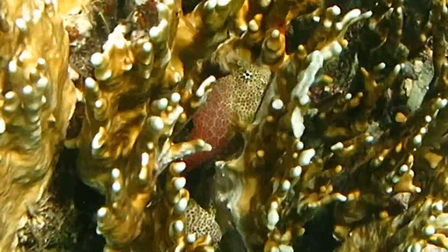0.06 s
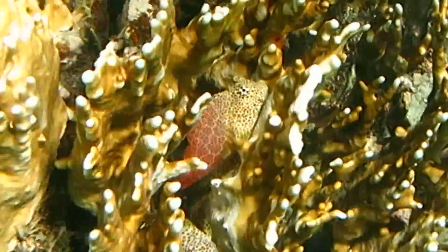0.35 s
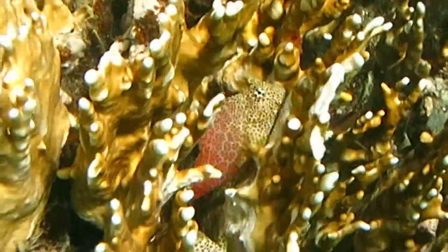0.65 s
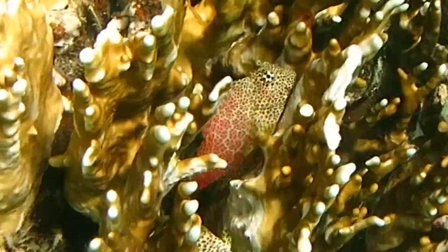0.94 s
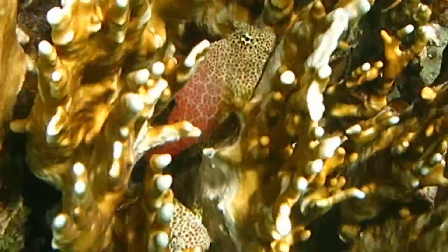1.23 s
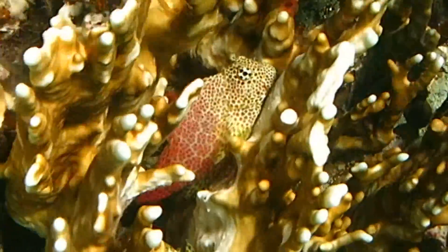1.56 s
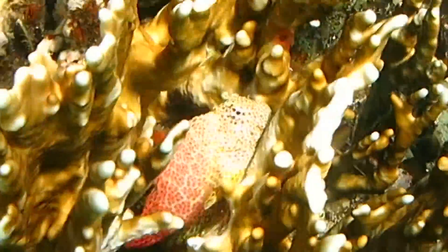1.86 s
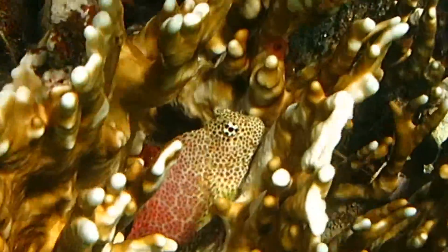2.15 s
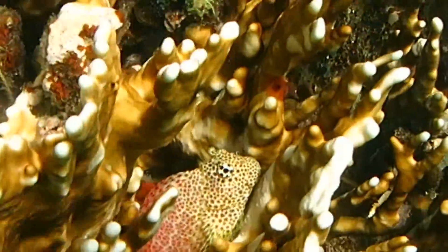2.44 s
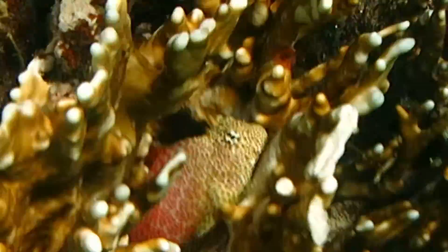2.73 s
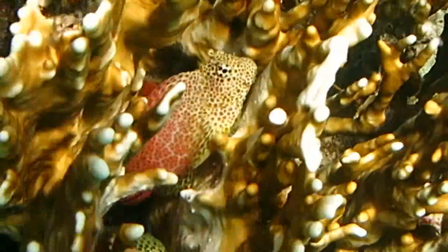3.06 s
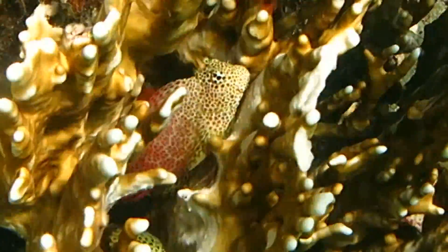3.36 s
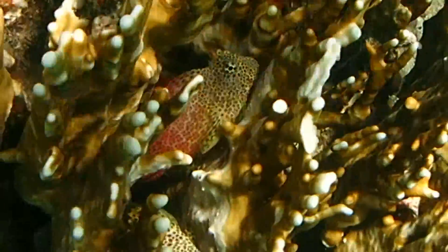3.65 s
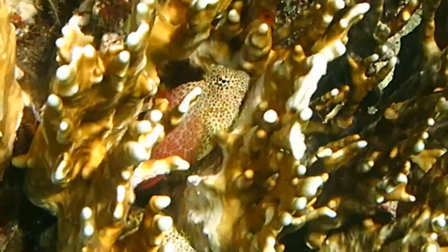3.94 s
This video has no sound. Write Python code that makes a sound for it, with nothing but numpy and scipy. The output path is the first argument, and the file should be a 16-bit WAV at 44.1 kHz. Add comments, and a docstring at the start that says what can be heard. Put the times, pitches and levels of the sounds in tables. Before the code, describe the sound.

A camera's zoom motor ratchets in rapid, ringing clicks from about 2 to 2.9 seconds and again from 3.4 to 4, heard inside an underwater housing. A low water wash, faint hiss and hum run throughout, with small rising bubble bloops and dull glugs. The water rumbles slightly more around 1 second. Shrimp snap here and there, sharpest near 0.2 and 3.7 seconds.

```python
"""A low wash of water and a camera's hiss, heard from inside its housing at a coral reef.
The housing hums at its modes, surging water rumbles and a faint motor whirrs. Shrimp snap,
air pockets bloop upward in pitch and water glugs against the housing. From about 2 s a small
drive, probably the zoom, ratchets in two runs of double knocks that ring the housing."""
import sys
import numpy as np
from scipy import signal
from scipy.fft import rfft, irfft
from scipy.io import wavfile
from scipy.ndimage import uniform_filter1d

SR = 44100
rng = np.random.default_rng(int(sys.argv[2]) if len(sys.argv) > 2 else 0)


def master_out(mix):
    """Clip the mix to full scale and print it as 16-bit PCM to the path in sys.argv[1]."""
    frames = np.transpose(np.atleast_2d(mix))
    ceiling = np.clip(frames, -1, 1)
    pcm = np.round(ceiling * 32767).astype(np.int16)
    wavfile.write(sys.argv[1], SR, pcm)


N = 176400


def amp(db):
    """Decibels to gain."""
    return 10 ** (np.asarray(db) / 20)


def unit_rms(x):
    """Scale to rms 1."""
    return x / np.sqrt(np.mean(x ** 2))


def seconds(samples):
    """Time axis."""
    return np.arange(samples) / SR


def add(out, start_s, sound):
    """Mix a sound in at a time."""
    i = int(np.clip(start_s * SR, 0, N - 1))
    out[..., i:i + sound.shape[-1]] += sound[..., :N - i]


def wander(rate_hz):
    """Random drift of rms 1."""
    hold = int(SR / rate_hz)
    steps = np.repeat(rng.standard_normal(N // hold + 1), hold)
    return unit_rms(uniform_filter1d(steps, hold)[:N])


def noise(spectrum, channels=2, envelope=1.):
    """Enveloped white noise, coloured by a causal filter of power gain 1."""
    hz, db = np.array(spectrum).T
    bins_hz = np.maximum(np.arange(N // 2 + 1) * SR / N, 1)
    gain = unit_rms(amp(np.interp(np.log(bins_hz), np.log(hz), db)))
    cepstrum = irfft(np.log(gain), N)
    cepstrum[1:N // 2] *= 2  # fold to minimum phase
    cepstrum[N // 2 + 1:] = 0
    response = irfft(np.exp(rfft(cepstrum)), N)[None, :N // 10]
    white = rng.standard_normal((channels, N))
    return signal.fftconvolve(envelope * white, response, axes=1)[:, :N]


# Wash colour. Each row: frequency in Hz, relative density in dB.
WASH_SPECTRUM = [(90, -20.5), (230, 3), (400, -1.5), (560, -1.5), (880, -6.5), (2000, -30.5)]


def water_wash(level_db=-55.5, wander_db=2):
    """Low wash of water, wavering in level."""
    return noise(WASH_SPECTRUM, channels=1) * amp(level_db + wander_db * wander(rate_hz=16))


# Hiss colour. Each row: frequency in Hz, relative density in dB.
HISS_SPECTRUM = [(100, -38.5), (500, 14.5), (1100, 15), (2000, 9.5), (2800, 3), (7000, -0.5), (9400, -3.5),
                 (10500, -5.5), (12000, -3.5), (13700, -1.5), (15500, -30)]


def camera_hiss(hiss_db=-52, whine_hz=15735, whine_left_db=-71, whine_right_db=-77):
    """The camera's own steady hiss and thin whine."""
    whine = np.sqrt(2) * np.sin(2 * np.pi * whine_hz * seconds(N))
    return amp(hiss_db) * noise(HISS_SPECTRUM) + np.outer(amp([whine_left_db, whine_right_db]), whine)


# Housing modes. Each row: frequency in Hz, T60 in seconds, left and right relative levels in dB,
# left and right polarities.
HOUSING_MODES = [(918, 0.035, -6, -31.5, 1, 1), (974, 0.0088, 3.5, -0.5, -1, 1),
                 (1216, 0.035, -2.5, -8.5, 1, -1), (1509, 0.022, -0.5, -7, 1, 1),
                 (1664.4, 0.041, -13, -8, 1, 1), (1760, 0.0043, -71, -2.5, -1, -1),
                 (2040, 0.035, -17, -13.5, -1, 1), (2215, 0.015, -9, -28, -1, 1),
                 (3035, 0.034, -34.5, -17, 1, 1)]


def housing_ring(detune_share=0.008, scatter_db=0.8, highpass_hz=684):
    """One blow rings the housing's damped modes, never quite the same twice."""
    t = seconds(4096)
    ring = np.zeros((2, len(t)))
    for hz, t60_s, left_db, right_db, left_sign, right_sign in HOUSING_MODES:
        detuned_hz = hz * (1 + detune_share * rng.standard_normal())
        mode = np.sin(2 * np.pi * detuned_hz * t) * np.exp(-np.log(1000) * t / t60_s)
        gains = np.sign([left_sign, right_sign]) * amp([left_db, right_db])
        ring += np.outer(gains, mode) * amp(scatter_db * rng.standard_normal())
    return signal.sosfilt(signal.butter(2, highpass_hz, "high", fs=SR, output="sos"), ring)


def housing_hum(level_db=-52, lowpass_hz=1950):
    """Noise keeps the housing murmuring at its modes."""
    hum = np.zeros((2, N))
    for _ in range(10):
        hum += signal.fftconvolve(rng.standard_normal((1, N)), housing_ring(), axes=1)[:, :N]
    hum = signal.sosfilt(signal.butter(2, lowpass_hz, fs=SR, output="sos"), hum)
    return amp(level_db) * unit_rms(hum)


# Rumble colour. Each row: frequency in Hz, relative density in dB.
RUMBLE_SPECTRUM = [(25, -45), (68, 1), (130, -3.5), (220, 6.5), (420, -28)]
# Course of the surge. Each row: time in seconds, level in dB.
SURGE_LEVELS = [(.1, -64.5), (.8, -62), (.92, -56), (1.02, -56.5), (1.3, -56), (1.55, -62.5), (2.2, -60.5),
                (3.6, -72.5)]


def water_rumble(wander_db=2):
    """Water surges past the housing."""
    surge_db = np.interp(seconds(N), *np.array(SURGE_LEVELS).T)
    return noise(RUMBLE_SPECTRUM, channels=1) * amp(surge_db + wander_db * wander(rate_hz=25.66))


def motor(pitch_hz=1619, wander_hz=5.5, level_db=-62):
    """A faint, slightly unsteady whirr inside the camera."""
    hz = pitch_hz + wander_hz * wander(rate_hz=60)
    return amp(level_db) * np.sqrt(2) * np.sin(2 * np.pi * np.cumsum(hz) / SR)


# Near shrimp snaps. Each row: start in seconds, left sizzle, left crack and housing ring gains in dB.
NEAR_SNAPS = [(0.207, -27.5, -33.5, -27), (.4328, -37, -43, -66), (0.8829, -31, -66, -48),
              (0.9807, -38.5, -43.5, -39), (1.086, -31.5, -68, -58), (2.7107, -40, -49, -57),
              (0.467, -62, -47, -49), (1.692, -52, -45, -38), (3.331, -38, -52, -52),
              (3.4596, -43, -36, -53), (3.5849, -24, -34, -55), (3.6693, -15, -25, -47),
              (3.8304, -38.5, -34.5, -44), (3.9883, -26.5, -32.5, -48)]
# Colours of a snap's high sizzle and lower crack. Each row: frequency in Hz, relative density in dB.
SIZZLE_SPECTRUM = [(7000, -40), (10500, -24), (11800, -4), (14000, 0), (15000, -6), (16500, -22)]
CRACK_SPECTRUM = [(600, -15), (2000, 3.5), (3600, 12), (5400, 14.5), (7700, 16), (9500, 8), (12000, -50),
                  (16000, -26)]


def shrimp(decay_s=0.0014, tail_s=0.004, tail_db=-15):
    """Near snaps sizzle, crack and ring the housing; far ones make a faint crackle."""
    right_lag_s, right_sizzle_db = 0.0001, -9
    far_per_s, far_db, far_spread_db = 43, -58.5, 6.5
    sizzle, crack, rings = np.zeros((3, 2, N))
    t = seconds(1024)
    envelope = np.exp(-t / decay_s) + amp(tail_db) * np.exp(-t / tail_s)
    for start_s, sizzle_db, crack_db, ring_db in NEAR_SNAPS:
        for side, (lag_s, side_db) in enumerate(((0, 0), (right_lag_s, right_sizzle_db))):
            add(sizzle[side], start_s + lag_s, amp(sizzle_db + side_db) * envelope)
            add(crack[side], start_s + lag_s, amp(crack_db + side_db / 2) * envelope)
        add(rings, start_s, amp(ring_db) * housing_ring())
    for _ in range(int(far_per_s * N / SR)):
        start_s = rng.uniform(0, N / SR)
        for layer in (sizzle, crack):
            stereo_db = far_db + far_spread_db * np.clip(rng.standard_normal(2), -2, 2)
            add(layer, start_s, np.outer(amp(stereo_db), envelope))
    return noise(SIZZLE_SPECTRUM, envelope=sizzle) + noise(CRACK_SPECTRUM, envelope=crack) + rings


# Air pockets. Each row: start in seconds, starting pitch in Hz, gain in dB, decay in seconds,
# pitch rise as a share.
AIR_POCKETS = [(.208, 940, -22, 0.003, .02), (.412, 231, -36, 0.028, 0.071),
               (.458, 218, -31.5, 0.016, 0.12), (.761, 212, -33, 0.015, 0.13),
               (0.846, 439, -35, 0.015, 0.11), (1.07, 242, -35.5, 0.018, 0.3),
               (1.162, 261, -38.5, .018, 0.48), (1.408, 200, -31, 0.015, 0.72),
               (1.516, 207, -27.5, 0.012, 1), (1.607, 219, -32, 0.015, 0.48),
               (1.784, 233, -32, 0.011, 0.74), (1.895, 409, -35, .018, 0.065),
               (1.928, 697, -36, 0.0081, 0.055), (1.959, 1250, -34, 0.0059, 0.041),
               (2.007, 209.5, -27, 0.017, 0.85), (2.128, 205.4, -30.5, 0.025, 0.18),
               (2.127, 483, -26.5, 0.0062, 0.042), (2.318, 209, -29.5, 0.027, 0.58),
               (2.473, 211, -29.5, 0.024, 0.29), (2.611, 236, -28.5, .018, 0.56),
               (2.715, 221, -36.5, 0.023, 0.56), (2.787, 235.7, -27.5, 0.026, 0.3),
               (2.937, 202, -26.5, 0.019, 0.5), (3.14, 251, -35, 0.021, 0.44),
               (3.248, 247, -32, 0.017, 0.31), (3.445, 231, -24.5, 0.0071, 0.62)]


def bubbles(attack_s=0.0028, glide_s=0.0342, wobble_share=0.045, tail_db=-35, highpass_hz=114):
    """Each air pocket rings and glides up as it dies away."""
    out, t = np.zeros(N), seconds(8192)
    attack = 1 - np.exp(-t / attack_s)
    for start_s, start_hz, db, decay_s, rise_share in AIR_POCKETS:
        glide = 1 + rise_share * (1 - np.exp(-t / glide_s))
        wobble = 1 + wobble_share * wander(rate_hz=133)[:len(t)]
        tone = np.sin(2 * np.pi * np.cumsum(start_hz * glide * wobble) / SR)
        fade = np.exp(-t / decay_s) + amp(tail_db) * np.exp(-t / (2 * decay_s))
        add(out, start_s, amp(db) * attack * fade * tone)
    return signal.sosfilt(signal.butter(2, highpass_hz, "high", fs=SR, output="sos"), out)


# Slaps of water. Each row: start in seconds, relative level in dB, decay in seconds.
WATER_SLAPS = [(0.765, -48, 0.011), (0.891, -35.5, 0.0075), (0.9008, -34, 0.0043), (1.094, -48.5, 0.024),
               (1.277, -43, 0.0088), (1.353, -44, 0.011), (2.688, -48.5, 0.0088), (2.767, -42.5, 0.0084),
               (1.677, -42.5, 0.0074), (1.889, -45, 0.023), (2.128, -42, 0.0067), (2.215, -47, 0.012),
               (3.258, -40.5, 0.0086), (3.849, -44, 0.011)]
# Glug colour. Each row: frequency in Hz, relative density in dB.
GLUG_SPECTRUM = [(35, -18), (70, -3.5), (240, 10.5), (380, -1), (560, 7), (710, 4.5), (950, -15),
                 (1300, -3.5), (6000, -73)]


def glugs(attack_s=0.00055, gain_db=6.5):
    """Short dull slaps of water on the housing, the same in both ears."""
    envelope, t = np.zeros(N), seconds(8192)
    attack = 1 - np.exp(-t / attack_s)
    for start_s, db, decay_s in WATER_SLAPS:
        add(envelope, start_s, amp(db + gain_db) * attack * np.exp(-t / decay_s))
    return noise(GLUG_SPECTRUM, channels=1, envelope=envelope)


# Ratchet strokes. Each row: start in seconds, relative level in dB, gap to second knock in seconds.
RATCHET_STROKES = [(2.027, 0, 0.0076), (2.071, -1.5, 0.0097), (2.1111, -2.5, 0.015), (2.1536, -6.5, 0.0085),
                   (2.1945, -3.5, 0.016), (2.236, -3.5, .0149), (2.2785, -3, 0.015), (2.3206, -3, 0.01),
                   (2.3619, -0.5, 0.0095), (2.4027, -0.5, 0.011), (2.4453, -2, 0.0093),
                   (2.4871, -2.5, 0.0093), (2.5294, -2.5, 0.0096), (2.5719, -1.5, 0.012),
                   (2.6129, -3, 0.013), (2.6526, -4.5, 0.014), (2.695, -3, 0.016), (2.736, -5.5, 0.022),
                   (2.777, -2.5, 0.013), (2.8211, -0.5, 0.013), (2.861, -3.5, 0.027),
                   (3.4022, -3.5, 0.0068), (3.4472, -3, 0.0085), (3.487, -0.5, 0.013), (3.536, -1, 0.0091),
                   (3.5722, -2, 0.012), (3.6128, -2, 0.013), (3.656, -2, 0.013), (3.6977, -1.5, 0.011),
                   (3.738, -1, 0.011), (3.7797, -3, 0.0098), (3.822, -4, 0.01), (3.8625, -3, 0.013),
                   (3.907, -3, 0.012), (3.9466, -2, 0.01), (3.9889, -2, 0.01)]
# Colour of a knock's contact noise. Each row: frequency in Hz, relative density in dB.
CONTACT_SPECTRUM = [(500, -19), (1550, 6.5), (2500, 2), (3100, 0.5), (4400, -8.5), (5800, -10.5),
                    (6800, -5.5), (8000, -16.5), (16000, -17)]


def ratchet(attack_s=0.00048, ring_gain_db=-26, contact_gain_db=-41.5, contact_decay_s=0.0055):
    """Two knocks and a weak rebound per stroke, each a brief crack and a ring of the housing."""
    rebound_s, rebound_db = 0.0091, -18
    rings, contact, t = np.zeros((2, N)), np.zeros(N), seconds(4096)
    attack = 1 - np.exp(-t / attack_s)
    for start_s, stroke_db, gap_s in RATCHET_STROKES:
        for delay_s, knock_db in ((0, 0), (gap_s, 0), (gap_s + rebound_s, rebound_db)):
            blow = amp(stroke_db + knock_db) * attack
            add(rings, start_s + delay_s, amp(ring_gain_db) * blow * housing_ring())
            add(contact, start_s + delay_s, amp(contact_gain_db) * blow * np.exp(-t / contact_decay_s))
    return rings + noise(CONTACT_SPECTRUM, envelope=contact)


def scene():
    """All sources, in stereo."""
    bed = water_wash() + camera_hiss() + housing_hum() + water_rumble() + motor()
    return bed + shrimp() + bubbles() + glugs() + ratchet()


def record(dry):
    """A steep low-pass cuts the top treble."""
    cutoff_hz = 16500
    return signal.sosfilt(signal.ellip(8, .2, 70, cutoff_hz, fs=SR, output="sos"), dry)


dry = scene()
out = record(dry)
master_out(out)
```